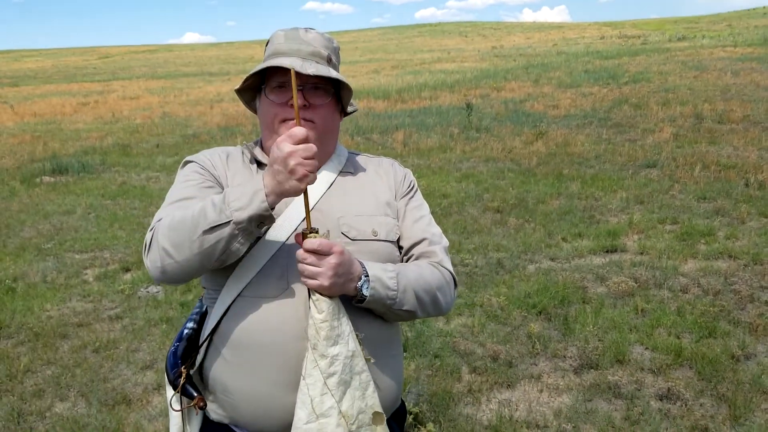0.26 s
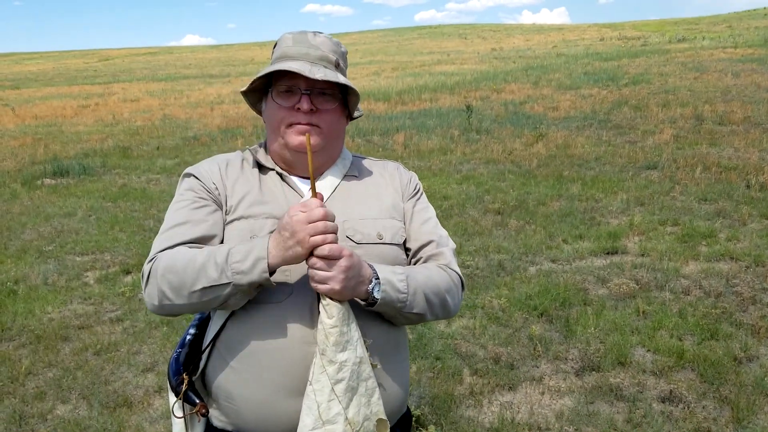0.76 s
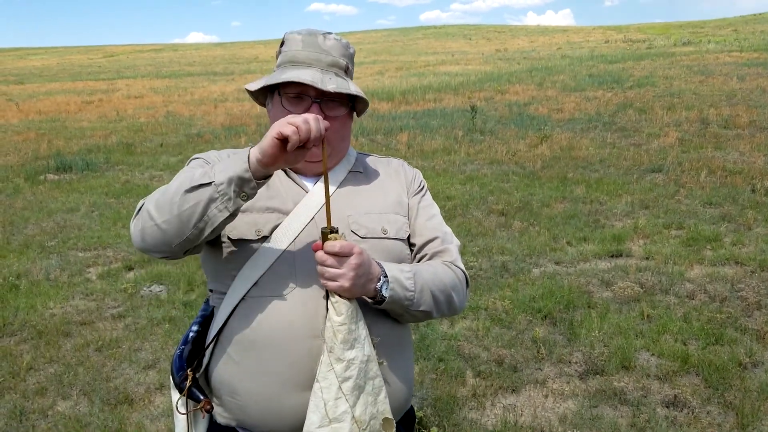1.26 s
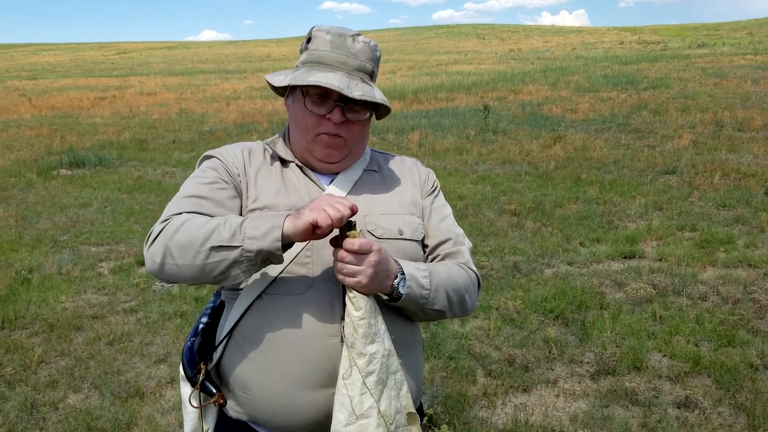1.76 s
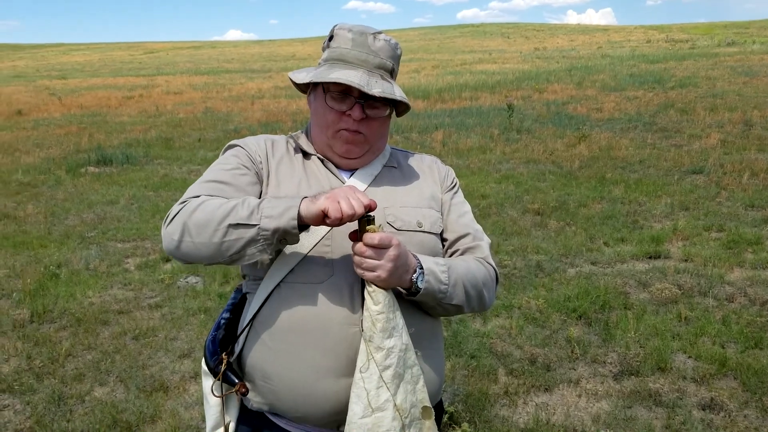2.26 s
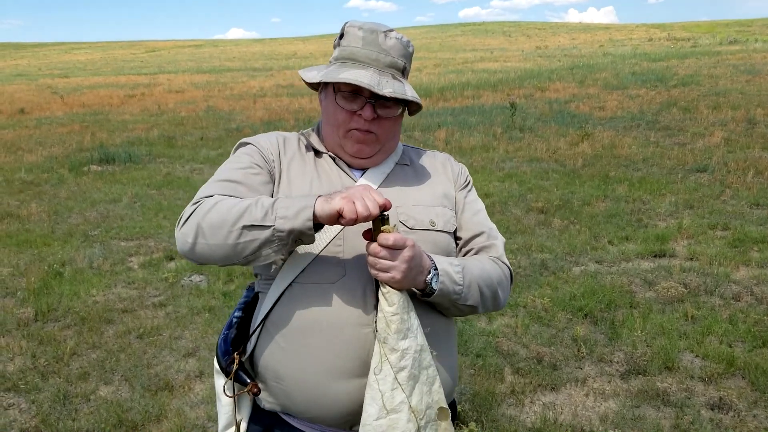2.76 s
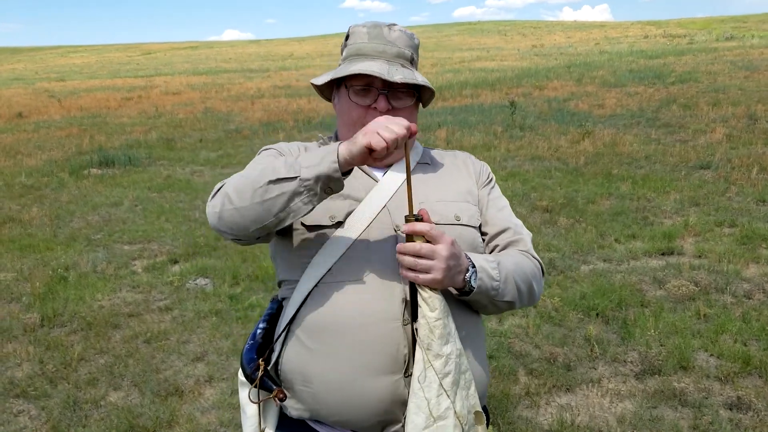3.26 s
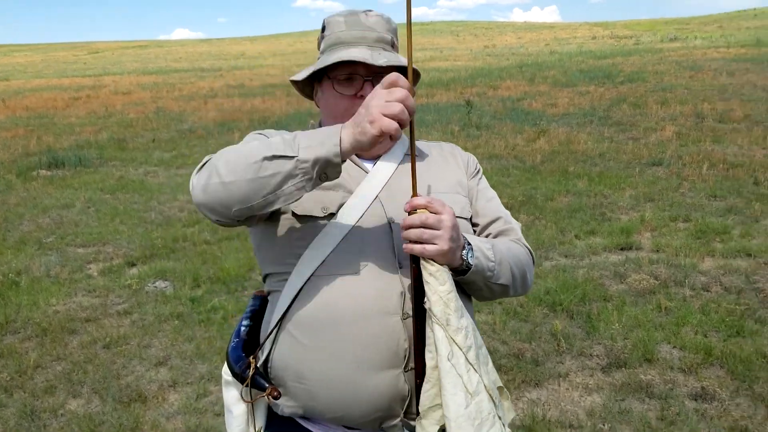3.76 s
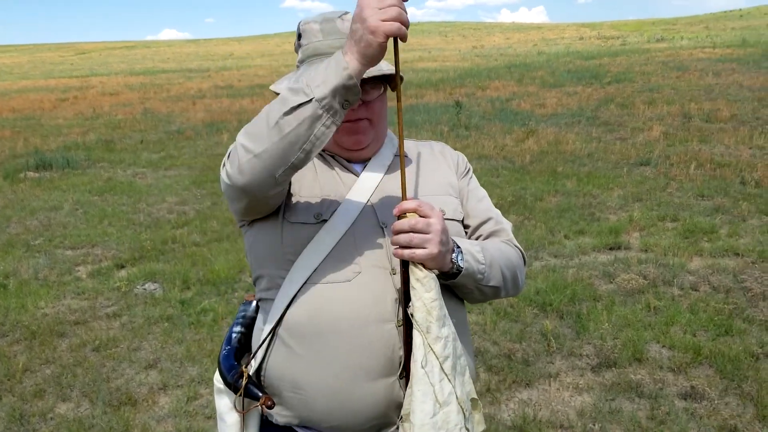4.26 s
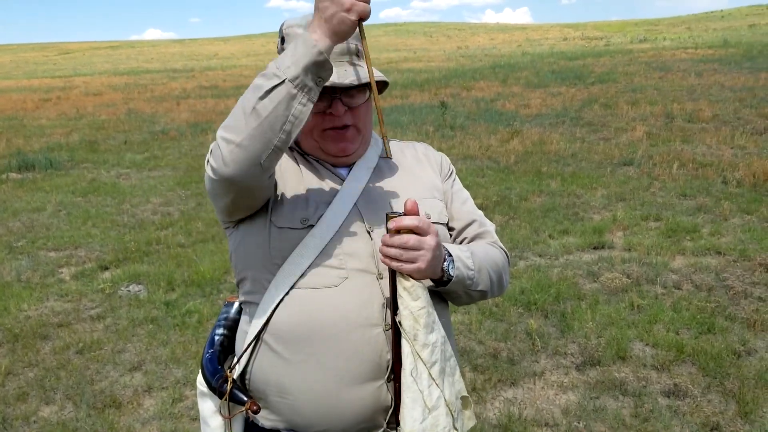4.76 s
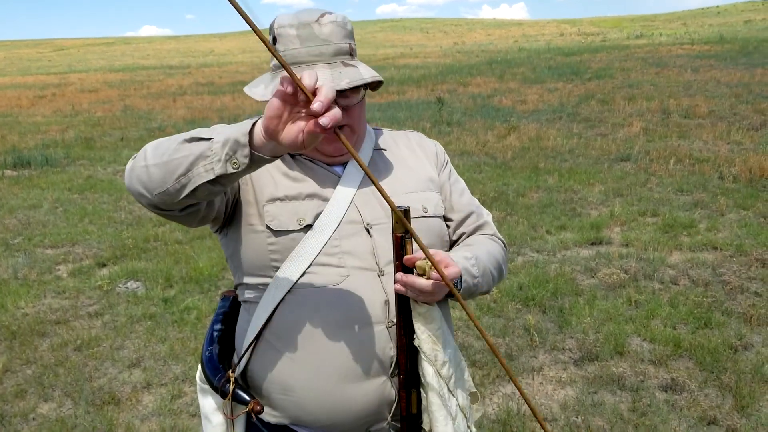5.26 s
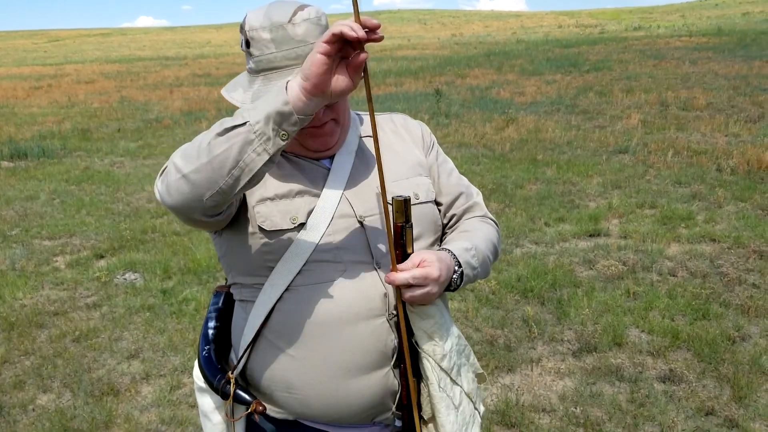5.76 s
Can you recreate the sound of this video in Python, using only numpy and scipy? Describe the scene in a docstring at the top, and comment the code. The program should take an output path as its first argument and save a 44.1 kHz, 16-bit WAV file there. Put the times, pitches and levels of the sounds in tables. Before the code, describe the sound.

Open grassland, close and dry, with no echo. A low steady background with very faint hiss sits beneath lumpy wind puffs that shift between left and right. From 0 to 0.5 s, light wooden ticks and faint scrapes come from a rod at a rifle muzzle, with a soft sleeve rub on the left; rustling and a pat or two continue to about 1.6 s. At 1.65 s a hard bright knock cracks with tiny rebounds. Faint ticks at 2.4-2.5 s lead to the strongest ram at 2.56 s, a quick clatter ringing briefly in the bore. After a quiet pause, scrapes and crisp ticks resume at 3.2 s, densest from 3.7 to 4.2 s, with short raspy strokes and cloth brushes until about 4.7 s. From 4.9 s strong wind rumbles and flutters in two waves; a lighter tap lands at 5.5 s, and the gust swells again to the end at 6 s.

```python
"""Open grassland: a wooden ramrod pushes a ball down a rifle barrel, close to a camera.
Rod: friction noise and short bursts filtered by the barrel modes give scrapes, muzzle ticks,
hard knocks when it is rammed home and one more tap after it is drawn out.
Sleeve: cloth-coloured friction noise and pats on the left. Wind: lumpy low noise, unrelated at
the two microphone ports, gusting at the end. Background: steady noise and faint hiss in bands."""
import sys
import numpy as np
from scipy import signal
from scipy.fft import rfft, irfft
from scipy.io import wavfile

SR = 44100
rng = np.random.default_rng(int(sys.argv[2]) if len(sys.argv) > 2 else 0)


def digitize_waveform(pressure):
    """Quantize a signal to 16-bit integers and store it at the path in sys.argv[1].

    Rows of a 2-D input are taken as channels; values are limited to [-1, 1].
    """
    field = np.atleast_2d(pressure).T
    bounded = np.clip(field, -1, 1)
    quanta = np.round(bounded * 32767).astype(np.int16)
    wavfile.write(sys.argv[1], SR, quanta)


N = 265462
TIME = np.arange(N) / SR
HZ = np.fft.rfftfreq(N, 1 / SR)
EDGE_HZ = 15900  # upper band limit

# Table levels are relative: the sources add fixed gains. Pan is left over right.
# Steady background noise colour: [f/Hz, density/dB]
STEADY_COLOUR = [(30, -19), (150, 6), (300, -0.5), (450, -13.5), (700, -24), (1500, -31), (4000, -30),
                 (7000, -33.5), (9000, -44), (11500, -34.5), (16000, -39)]
# Faint hiss bands that come and go: [t/s, lower/dB, upper/dB, upper pan/dB, top fizz/dB]
HISS_CURVES = [(0,-68,-88,-8.5,-69.5), (1.9,-65.5,-89.5,3.5,-78), (2.8,-67,-89,8.5,-70),
               (3.5,-63.5,-55,-4,-88), (3.95,-64.5,-80,-7,-69), (4.65,-62.5,-79,3,-78.5),
               (4.8,-62,-68.5,1,-76), (5.2,-58.5,-66.5,0.5,-77), (5.25,-80,-76,11.5,-89),
               (6.02,-92.5,-80,20,-81)]
# Low wind buffeting colour: [f/Hz, density/dB]
RUMBLE_COLOUR = [(15, -19.5), (30, -15), (45, 0.5), (75, 2.5), (110, -6), (160, -16.5), (250, -28.5),
                 (400, -49), (800, -74), (2000, -100)]
# Higher wind flutter colour: [f/Hz, density/dB]
FLUTTER_COLOUR = [(30, -23), (90, 1.5), (160, 1.5), (260, -5.5), (400, -15.5), (600, -27.5), (900, -44),
                  (1600, -69), (4000, -89.5)]
# Breeze on the ports, swinging from side to side: [t/s, level/dB, pan/dB]
BREEZE_CURVE = [(0.0,-58,4), (0.06,-34,20), (0.25,-42.5,16), (0.62,-33,22.5), (0.76,-37.5,11),
                (1.02,-35,-6), (1.12,-46,-13.5), (1.6,-33.5,6), (1.82,-36,-16.5), (1.98,-40,-7),
                (2.2,-35,9), (2.7,-30.5,-1), (3.1,-42,-17), (3.7,-43,-17), (4.08,-38.5,0), (4.45,-51,-1.5),
                (4.87,-49,5)]
# Strong closing gust, two waves: [t/s, level/dB, pan/dB, flutter/dB]
CLOSING_GUST = [(4.88,-63,14,-75), (4.98,-30.5,12,-65), (5.14,-21,19,-40.5), (5.26,-26,-1,-36.5),
                (5.42,-29.5,-4.5,-45), (5.49,-31,-18.5,-60.5), (5.58,-44.5,-3,-35.5), (6.02,-19.5,-0.5,-35)]
# Single puffs on the ports: [peak t/s, width at half power/s, level/dB, pan/dB, flutter/dB]
WIND_PUFFS = [(0.296,0.017,-22.5,28,-45.5), (0.422,0.046,-22.5,26,-50.5), (0.535,0.038,-24,17,-60),
              (0.645,0.066,-23.5,18,-50), (0.822,0.1,-31.5,-21,-50), (1.31,0.061,-31,-11,-75),
              (1.464,0.042,-39,13,-78), (1.671,0.036,-23.5,5,-49.5), (1.748,0.082,-27.5,-18,-61),
              (2.479,0.07,-27,31,-47), (2.623,0.086,-33,5,-51.5), (2.872,0.067,-27,-28,-54),
              (3.171,0.062,-35.5,-21,-70), (3.38,0.05,-37,-32,-63), (3.587,0.076,-28.5,-32,-54.5),
              (4.949,0.02,-20.5,14,-68), (5.077,0.047,-17,6.5,-47.5), (5.192,0.016,-21,9,-22),
              (5.253,0.012,-18.5,-7,-25), (5.363,0.048,-18.5,-4,-30.5), (5.571,0.03,-11,-1,-31.5),
              (5.705,0.035,-26,-2.5,-25.5), (5.917,0.017,-15.5,2,-40.5)]
# Cloth fibre hiss colour: [f/Hz, density/dB]
FIBRE_COLOUR = [(200, -19), (800, -21.5), (1500, 5), (3000, 4), (5500, 0.5), (7500, -3), (9500, -16.5),
                (13000, -14), (16000, -20.5)]
# Hollow low rub colour: [f/Hz, density/dB]
HOLLOW_COLOUR = [(60, -9.5), (200, 4), (600, 0.5), (1000, 0.5), (1600, -10), (3000, -24), (8000, -27.5)]
# Passes of hand and sleeve:
# [start t/s, length/s, level/dB, swell/dB, tilt/(dB/octave), hollow rub relative to level/dB]
SLEEVE_PASSES = [(0.0,0.11,-49,-2,-1.5,-35), (0.33,0.076,-47,0,-4.5,-21.5), (0.701,0.065,-56.5,6,8,-4),
                 (0.805,0.082,-46,-3.5,3,-6), (0.914,0.25,-46.5,11.5,1,-13), (1.205,0.079,-46.5,1,0,-41),
                 (1.331,0.097,-54.5,2,3,-31), (1.458,.14,-46.5,-4,-1,-51), (1.835,0.059,-58.5,-15,6.5,4.5),
                 (3.883,0.053,-50.5,1.5,2.5,5.5), (4.003,.16,-41.5,-9.5,5,-1.5),
                 (4.32,0.058,-40.5,5.5,2.5,-6), (4.395,0.051,-43.5,10,-1,-12.5),
                 (4.463,0.005,-36.5,-1.5,-6,-45), (4.608,0.027,-36,-7,-0.5,-5.5),
                 (4.706,0.032,-40,5,1.5,-2), (4.854,0.012,-44.5,-6,-1.5,-17.5)]
# Soft pats of hand and cloth: [t/s, level/dB]
CLOTH_PATS = [(0.661, -46.5), (0.758, -50), (0.876, -36), (4.311, -33.5), (4.698, -40.5), (4.851, -52)]
# Modes of rod and barrel: [f/Hz, width/Hz, level/dB]
BARREL_MODES = [(1135, 47, -3.5), (1697, 83, 3), (2340, 150, -11.5), (2630, 170, -8), (3830, 70, -0.5),
                (4340, 36, 3.5), (4880, 80, 1.5), (5570, 210, 1), (6680, 210, 1), (7170, 110, 1),
                (7880, 340, -2), (7774, 43, -11), (11000, 320, -4.5), (11160, 65, -12.5),
                (13130, 90, -12.5)]
# Broad colour of the wooden rod on the muzzle: [f/Hz, level/dB]
WOOD_COLOUR = [(150, -37), (700, -20.5), (1100, -24), (2000, -0.5), (3800, -4), (8000, -2.5), (10000, -8),
               (13000, -2.5), (16000, -20)]
# Broad colour of a knock's body: [f/Hz, level/dB]
KNOCK_COLOUR = [(100, -12), (330, -5.5), (650, -21.5), (1100, -1.5), (1500, -11), (2400, 2.5),
                (4000, -11.5), (8000, 3), (12000, 7.5), (16000, 3)]
# Reflection of the scrape off the gripping hand: [t/s, extra path/m]
HAND_PATH = [(0, .3), (0.45, 0.25), (3.28, 0.18), (3.5, 0.39), (3.95, 0.24), (4.18, 0.217), (4.49, 0.26),
             (4.61, 0.16)]
# Scrapes of the rod in the muzzle, and a hand sliding along it:
# [start t/s, length/s, level/dB, swell start to end/dB, tilt/(dB/octave)]
ROD_STROKES = [(0.0,0.12,-60,-12.5,-3.5), (0.13,0.16,-72.5,-10,-7.5), (0.337,0.048,-53,4.5,-2.5),
               (0.438,0.012,-60,-4.5,-6.5), (1.165,0.032,-61,-10,-2.5), (1.59,0.062,-52,10,-2),
               (1.67,0.075,-70.5,3,-5), (2.96,0.19,-68.5,5.5,6), (3.195,0.053,-58.5,-3,-1),
               (3.306,0.11,-45.5,-2,-1), (3.445,0.075,-55.5,-21.5,-1), (3.55,0.43,-66,-11,-1.5),
               (3.89,0.066,-54.5,6,-2), (3.997,0.045,-41,1,2.5), (4.125,0.042,-47,7,0),
               (4.33,0.14,-67.5,-6,13), (4.517,0.08,-43.5,4,0), (4.62,0.02,-51,-8.5,-6.5)]
# Light ticks of the rod on the muzzle: [t/s, level/dB, pan/dB, tilt/(dB/octave)]
MUZZLE_TICKS = [(0.1051,-31.5,4.5,-4), (0.2552,-36.5,27,-6.5), (0.2792,-39,-2,-1), (0.2925,-33,18,-5.5),
                (0.3145,-36.5,-9,-2), (0.3299,-33,19,-3), (0.3834,-33.5,-10,-5), (0.4318,-36.5,-4,-6),
                (0.771,-41,10,-5), (1.161,-36,15,2), (2.4308,-51,23,4), (2.49,-48.5,4,-2),
                (2.502,-43.5,11,6), (3.188,-40.5,3,-3), (3.2311,-43,5,-5), (3.286,-31,1,-2.5),
                (3.3027,-25.5,12,17), (3.495,-45,-8,-1), (3.525,-37.5,1,-3), (3.5886,-33,5,1),
                (3.7274,-44,8,8), (3.7609,-26,6.5,3.5), (3.811,-37.5,4,3), (3.8738,-30,4,10),
                (3.908,-28.5,8,9), (3.93,-24,6,2.5), (3.9737,-29,0,1), (4.018,-42,1,-11), (4.077,-27,3,1),
                (4.1104,-33,1,2), (4.1568,-24,1,-3), (4.4658,-27,6,16), (4.493,-44,-14,10),
                (4.5154,-28.5,0,5), (4.52,-29,1,-1), (4.5787,-29,-4,18)]
# Hard knocks of the rod with rebounds:
# [t/s, level/dB, crack f/Hz, crack over body/dB, crack pan/dB, body tilt/(dB/octave)]
ROD_KNOCKS = [(1.6477,-12,12500,-12,-10,-2), (1.6465,-27.5,8900,15.5,4,1), (1.6524,-7,13400,6.5,9,-6),
              (1.6544,-15.5,9030,7,2.5,-11), (1.658,-18.5,8950,4,-2,-2.5), (2.5584,-3,8200,-0.5,6,-1),
              (2.5595,-5.5,11950,7.5,9,-6.5), (2.565,-13,13100,4.5,9,-2.5), (2.5718,-5,8200,-4,8.5,-2),
              (2.574,-12,8100,-6.5,-2,2), (2.5881,-17.5,5580,-12.5,7.5,-12), (2.593,-9.5,5980,-15,9,-7),
              (2.597,-14.5,5360,-9,-2,-10.5), (5.4919,-26.5,10500,10.5,-3,11), (5.494,-12,6840,-1.5,-5,-8),
              (5.497,-27,2430,14.5,4.5,16), (5.5004,-33.5,2390,9,-15,-2), (5.5033,-21.5,2380,3,14,-13)]

SLEEVE_ATTACK_S, SLEEVE_RELEASE_S = 0.0029, 0.009
ROD_ATTACK_S, ROD_RELEASE_S = 0.0088, 0.0083
EASE_SHARE = 0.12  # share of a stroke's length added to its attack and release times
SOUND_M_PER_S = 343


def gain_of(db):
    """Decibels to amplitude."""
    return 10 ** (np.asarray(db) / 20)


def evened(x):
    """Scales to rms 1."""
    return x / np.sqrt(np.mean(x ** 2) + 1e-20)


def colour(points, hz=HZ):
    """Gain interpolated in dB over log frequency."""
    point_hz, db = np.transpose(points)
    return gain_of(np.interp(np.log(hz + 1), np.log(point_hz), db))


def played(rows):
    """Each column of a curve table, at every sample."""
    point_s, *columns = np.transpose(rows)
    return [np.interp(TIME, point_s, column) for column in columns]


def panned(pan_db):
    """Left and right gains of constant total power."""
    half_db = np.atleast_1d(pan_db) / 2
    gains = gain_of(np.array([half_db, -half_db]))
    return gains / np.sqrt((gains ** 2).mean(0))


def shaped(x, gain):
    """Filters by a gain at each frequency, to rms 1."""
    return evened(irfft(rfft(x) * gain, N))


def drift(rate_hz):
    """Slow random signal of rms 1, Gaussian spectrum."""
    return shaped(rng.standard_normal(N), np.exp(-(HZ / rate_hz) ** 2))


def pair(x, same):
    """Two ports share row 0 by power share `same`; the rest is their own."""
    same = np.clip(same, 0, 1)
    return np.sqrt(same) * x[0] + np.sqrt(1 - same) * x[1:]


def add(mix, start_s, sound):
    """Mixes a stereo sound in at its start time."""
    part = mix[:, round(start_s * SR):][:, :sound.shape[1]]
    part += sound[:, :part.shape[1]]


def causal(gain, size=4096):
    """Minimum-phase impulse response of energy 1 for a gain function of frequency."""
    cepstrum = irfft(np.log(gain(np.fft.rfftfreq(size, 1 / SR)) + 1e-5))
    cepstrum[1:size // 2] *= 2
    cepstrum[size // 2 + 1:] = 0
    response = irfft(np.exp(rfft(cepstrum)))
    return response / np.linalg.norm(response)


def through(x, response):
    """Convolves both ports with a response."""
    return signal.fftconvolve(x, response[None], axes=1)[:, :x.shape[1]]


def burst(decay_s, size=4096):
    """Dying spray of micro-impacts, spectrally evened, energy 1 per port; decay_s sets its time scale."""
    decay = gain_of(-60 * np.arange(size) / SR / decay_s)
    spray = pair(rng.standard_normal((3, size)), same=0.53) * decay
    spectrum = rfft(spray)
    spray = irfft(spectrum / (abs(spectrum) + 1e-9)) * np.sqrt(decay)
    return spray / np.linalg.norm(spray, axis=1, keepdims=True)


def friction(slips_per_s, spread_db, smooth, same):
    """Tiny slips of uneven size over a smooth hiss; the slip rate is that of each mixed row."""
    hits = rng.random((3, N)) < slips_per_s / SR
    slips = hits * gain_of(spread_db * np.minimum(rng.exponential(1, (3, N)), 4))
    slips = evened(slips * rng.choice([-1, 1], (3, N)))
    return pair(slips + smooth * rng.standard_normal((3, N)), same)


def strokes(rows, attack_s, release_s):
    """Rubbing sets in, swells or eases, and dies: gain and spectral tilt at each sample."""
    power, tilt_sum = np.full(N, 1e-14), np.zeros(N)
    for start_s, length_s, db, swell_db, tilt_db in rows:
        progress = np.clip((TIME - start_s) / length_s, 0, 1)
        ease_s = EASE_SHARE * length_s
        early = np.maximum(start_s - TIME, 0) / (attack_s + ease_s)
        late = np.maximum(TIME - start_s - length_s, 0) / (release_s + ease_s)
        fade = np.exp(-np.minimum(early + late, 20))
        stroke = (gain_of(db + swell_db * (progress - 0.5)) * fade) ** 2
        power += stroke
        tilt_sum += stroke * tilt_db
    return np.sqrt(power), tilt_sum / power


def wandering(x, tilt_db, patch_db, patch_hz, patch_s):
    """The contact point wanders: bands swell and fade; tilt_db is in dB per octave at each sample."""
    hz, frame_s, z = signal.stft(x, SR, nperseg=512, noverlap=384)
    field = rng.standard_normal((len(hz), len(frame_s)))
    across = np.fft.fftfreq(len(hz), hz[1])[:, None]
    along = np.fft.fftfreq(len(frame_s), frame_s[1])
    blur = np.exp(-(across * patch_hz) ** 2 - (along * patch_s) ** 2)
    patches = evened(np.fft.ifft2(np.fft.fft2(field) * blur).real)
    octaves = np.log2(np.clip(hz, 1000, 10000) / 5500)[:, None]
    tilt = gain_of(octaves * np.interp(frame_s, TIME, tilt_db))
    z = z * evened(gain_of(patch_db * patches)) * tilt
    return signal.istft(z, SR, nperseg=512, noverlap=384)[1][:, :N]


def hiss(centre_hz, width_hz, order):
    """Band of noise, unrelated at the two ports."""
    band = 1 / (1 + np.abs(2 * (HZ - centre_hz) / width_hz) ** order)
    return shaped(rng.standard_normal((2, N)), band)


def background():
    """Steady coloured noise, two faint hiss bands that come and go, and a thin fizz on top."""
    lower_db, upper_db, upper_pan_db, fizz_db = played(HISS_CURVES)
    noise = pair(rng.standard_normal((3, N)), same=0.51)
    steady = gain_of(-58) * panned(6.5) * shaped(noise, colour(STEADY_COLOUR))
    lower = gain_of(lower_db) * panned(22) * hiss(1676, width_hz=950, order=5)
    upper = gain_of(upper_db) * panned(upper_pan_db) * hiss(3660, width_hz=1500, order=3)
    fizz = gain_of(fizz_db) * panned(4) * hiss(13000, width_hz=6100, order=6)
    return steady + lower + upper + fizz


def eddies(strength, spectrum, lump_db, lump_hz, steady_s):
    """Turbulence, unrelated at the two ports, in lumps under the strength of the wind."""
    noise = rng.standard_normal((2, N))
    lumps = gain_of(lump_db * np.array([drift(lump_hz), drift(lump_hz)]))
    x = shaped(noise * lumps, colour(spectrum))
    # Level the slow power so that `strength` sets it
    window = signal.windows.hann(int(steady_s * SR))
    power = signal.fftconvolve(x ** 2, window[None] / window.sum(), "same", axes=1)
    return x / np.sqrt(power + 1e-4) * strength


def wind():
    """Breeze, closing gust and bell-shaped puffs add in power: low buffeting plus higher flutter."""
    breeze_db, breeze_pan_db = played(BREEZE_CURVE)
    gust_db, gust_pan_db, gust_flutter_db = played(CLOSING_GUST)
    low_power = (gain_of(breeze_db) * panned(breeze_pan_db)) ** 2
    low_power += (gain_of(gust_db) * panned(gust_pan_db)) ** 2
    high_power = (gain_of(gust_flutter_db) * panned(gust_pan_db)) ** 2
    for peak_s, width_s, db, pan_db, flutter_db in WIND_PUFFS:
        halvings = np.minimum((2 * (TIME - peak_s) / width_s) ** 2, 40)
        bell = panned(pan_db) ** 2 * 0.5 ** halvings
        low_power += gain_of(db) ** 2 * bell
        high_power += gain_of(flutter_db) ** 2 * bell
    rumble = eddies(np.sqrt(low_power), RUMBLE_COLOUR, lump_db=4.5, lump_hz=27, steady_s=0.094)
    flutter = eddies(np.sqrt(high_power), FLUTTER_COLOUR, lump_db=9.0, lump_hz=45.46, steady_s=0.097)
    return rumble + gain_of(5.5) * flutter


def cloth_pats():
    """Soft contacts: short bursts through the low cloth colour with a little fibre treble."""
    pats = np.zeros((2, N))
    for start_s, db in CLOTH_PATS:
        add(pats, start_s, gain_of(db + 17) * burst(decay_s=0.0115))
    pat_gain = lambda hz: colour(HOLLOW_COLOUR, hz) + gain_of(-21.0) * colour(FIBRE_COLOUR, hz)
    return through(pats, causal(pat_gain))


def sleeve():
    """Cloth fibres hiss close to the left port; each pass adds its own share of a hollow low rub; pats."""
    fibre_rows = [row[:-1] for row in SLEEVE_PASSES]
    hollow_rows = [(start_s, length_s, db + hollow_db, swell_db, tilt_db)
                   for start_s, length_s, db, swell_db, tilt_db, hollow_db in SLEEVE_PASSES]
    fibre_gain, tilt_db = strokes(fibre_rows, SLEEVE_ATTACK_S, SLEEVE_RELEASE_S)
    hollow_gain, _ = strokes(hollow_rows, SLEEVE_ATTACK_S, SLEEVE_RELEASE_S)
    fibre_slips = friction(slips_per_s=2800, spread_db=3.0, smooth=1.0, same=0.13)
    hollow_slips = friction(slips_per_s=900, spread_db=5.5, smooth=1.0, same=0.09)
    fibres = shaped(fibre_slips, colour(FIBRE_COLOUR))
    hollow = shaped(hollow_slips, colour(HOLLOW_COLOUR))
    waver = gain_of(1.0 * drift(rate_hz=13))
    rub = waver * (gain_of(-5.5) * fibre_gain * fibres + hollow_gain * hollow)
    rub = wandering(rub, tilt_db, patch_db=2.2, patch_hz=1200, patch_s=0.07)
    return panned(25.6) * (rub + cloth_pats())


def barrel(hz, broad, ring_db):
    """Broad colour with the modes of rod and barrel added in power."""
    modes = sum(gain_of(db + ring_db) ** 2 / (1 + (2 * (hz - mode_hz) / width_hz) ** 2)
                for mode_hz, width_hz, db in BARREL_MODES)
    return np.sqrt(colour(broad, hz) ** 2 + modes)


def reflected(x, share):
    """The hand's reflection combs the sound; the bands glide as the hand moves."""
    path_m, = played(HAND_PATH)
    delay_s = path_m / SOUND_M_PER_S
    echo = np.array([np.interp(TIME - delay_s, TIME, port) for port in x])
    return (x + share * echo) / np.sqrt(1 + share ** 2)


def scrape():
    """Rod friction, with a hand sliding along it, rings the barrel; the hand's pressure wavers."""
    pressure, tilt_db = strokes(ROD_STROKES, ROD_ATTACK_S, ROD_RELEASE_S)
    grain = friction(slips_per_s=800, spread_db=4.5, smooth=0.55, same=0.5)
    drive = grain * pressure * gain_of(3.4 * drift(rate_hz=28))
    drive = wandering(drive, tilt_db, patch_db=3, patch_hz=750, patch_s=0.04)
    drive = reflected(drive, share=0.4)
    response = causal(lambda hz: barrel(hz, WOOD_COLOUR, ring_db=1.0))
    return gain_of(1.5) * panned(3.4) * through(drive, response)


def ticks():
    """The wobbling rod touches the muzzle at varied spots: a dry snap and a little ringing chatter."""
    out = np.zeros((2, N))
    spots = rng.standard_normal((len(MUZZLE_TICKS), 32))
    for (start_s, db, pan_db, tilt_db), spot in zip(MUZZLE_TICKS, spots):
        spot_db = lambda hz: 3 * np.interp(hz, np.linspace(0, EDGE_HZ, len(spot)), spot)
        touch = lambda hz: gain_of(spot_db(hz) + tilt_db * np.log2(np.clip(hz, 1000, 7000)))
        snap_response = causal(lambda hz: colour(WOOD_COLOUR, hz) * touch(hz))
        ring_response = causal(lambda hz: barrel(hz, WOOD_COLOUR, ring_db=9) * touch(hz))
        snap = through(burst(decay_s=0.012), snap_response)
        ring = through(burst(decay_s=0.04), ring_response)
        add(out, start_s, gain_of(db + 9) * panned(pan_db) * (snap + gain_of(4) * ring))
    return out


def resonance(hz, centre_hz):
    """Contact peak: one resonance with the lows rolled off."""
    detune = (hz - centre_hz) / (0.09 * centre_hz)
    return hz / (hz + centre_hz) / np.sqrt(1 + detune ** 2)


def knocks():
    """Hard blows: a bright crack and a duller rattle of the rod in the bore, whose treble dies first."""
    out = np.zeros((2, N))
    for start_s, db, crack_hz, crack_db, pan_db, tilt_db in ROD_KNOCKS:
        contact = causal(lambda hz: resonance(hz, crack_hz))
        crack = gain_of(crack_db) * panned(pan_db) * through(burst(decay_s=0.005), contact)
        body_tilt = lambda hz: gain_of(tilt_db * np.log2(np.maximum(hz / 3000, 1)))
        body = lambda hz: barrel(hz, KNOCK_COLOUR, ring_db=3) * body_tilt(hz)
        dull_body = lambda hz: body(hz) / np.sqrt(1 + (hz / 7000) ** 4)
        rattle = through(burst(decay_s=0.045), causal(body))
        tail = through(burst(decay_s=0.13), causal(dull_body))
        bore = panned(0.5 * pan_db) * (gain_of(-2.5) * rattle + gain_of(-13.0) * tail)
        add(out, start_s, gain_of(db) * (crack + bore))
    return out


def scene():
    """All close and dry: the grassland gives no echo."""
    return scrape() + ticks() + knocks() + sleeve() + wind() + background()


def record(dry):
    """The camera cuts the deepest wind rumble and limits the band."""
    low_cut = signal.butter(3, 36, "highpass", fs=SR, output="sos")
    high_cut = signal.firwin(255, EDGE_HZ, window=("kaiser", 8), fs=SR)
    return signal.oaconvolve(signal.sosfilt(low_cut, dry), high_cut[None], "same")


dry = scene()
out = record(dry)
digitize_waveform(out)
```